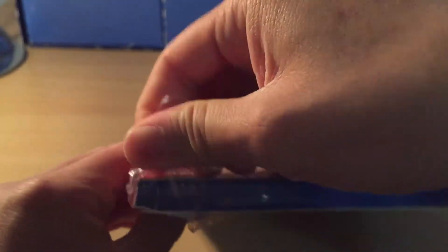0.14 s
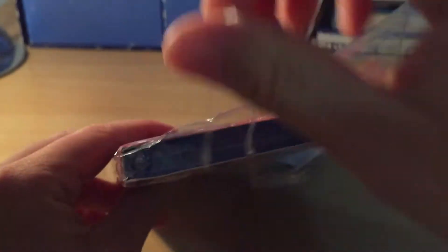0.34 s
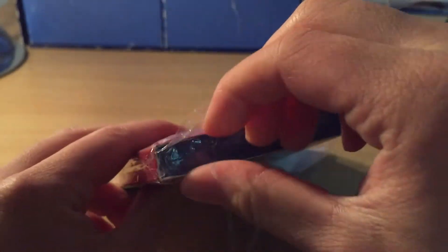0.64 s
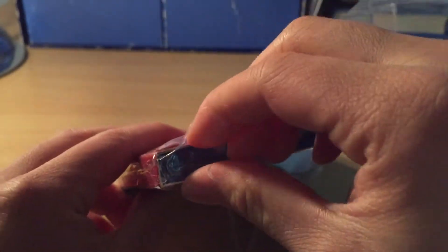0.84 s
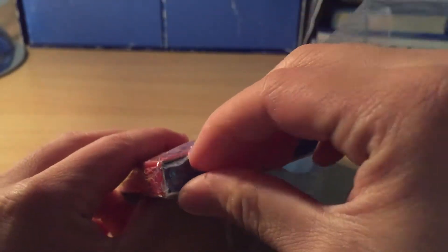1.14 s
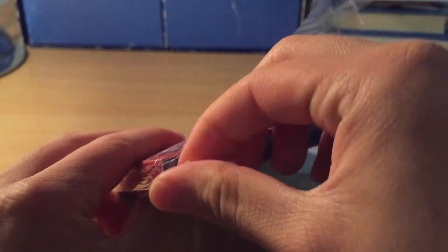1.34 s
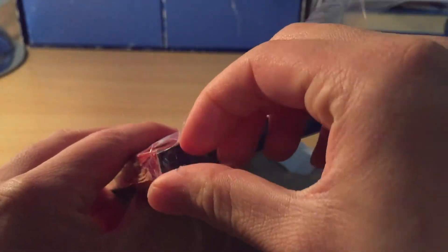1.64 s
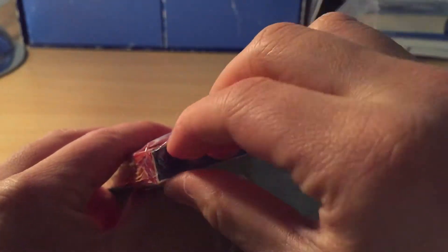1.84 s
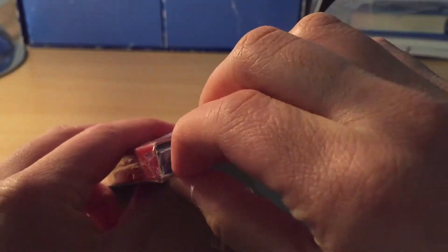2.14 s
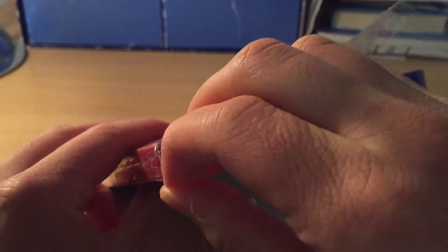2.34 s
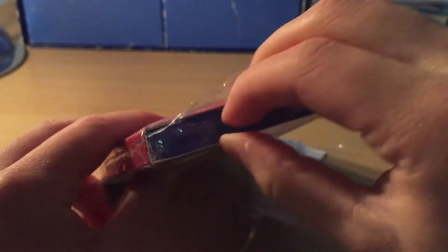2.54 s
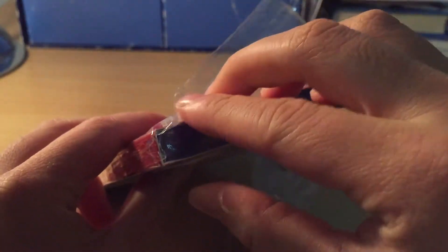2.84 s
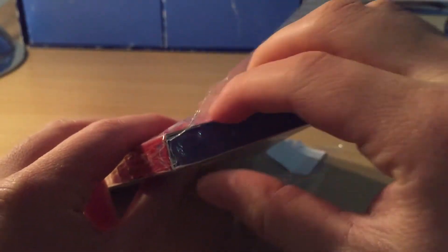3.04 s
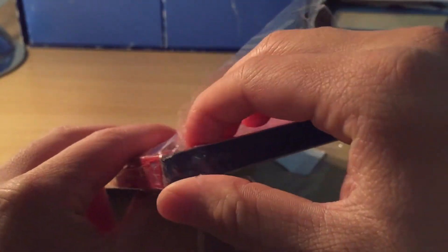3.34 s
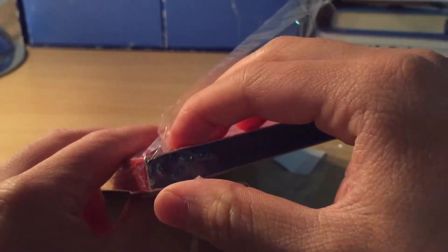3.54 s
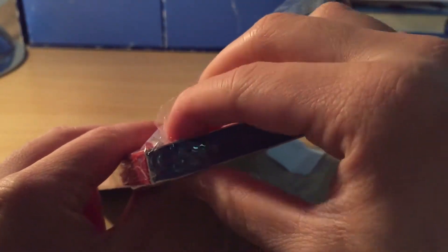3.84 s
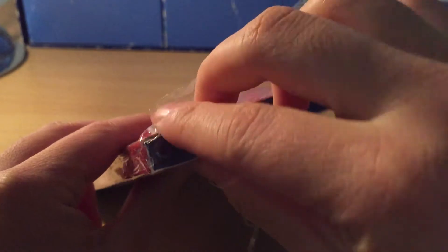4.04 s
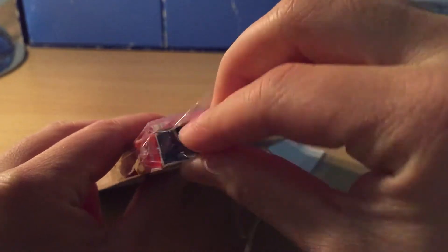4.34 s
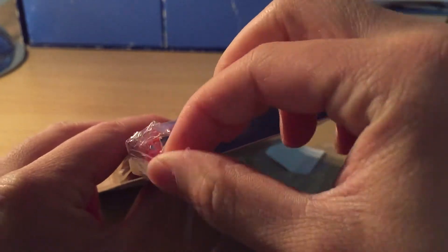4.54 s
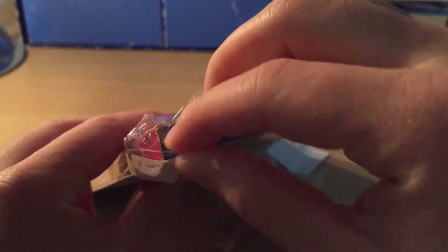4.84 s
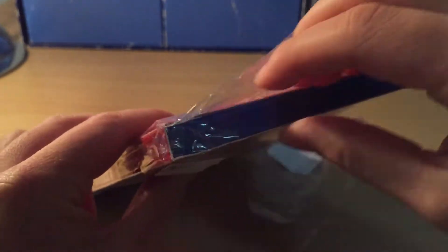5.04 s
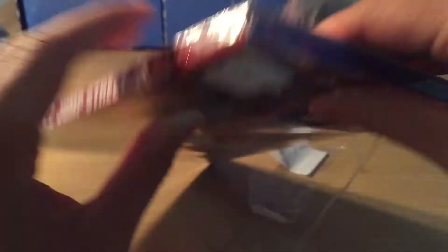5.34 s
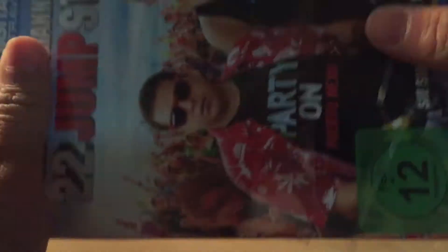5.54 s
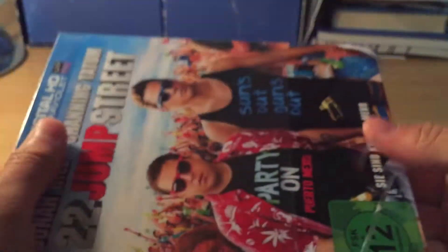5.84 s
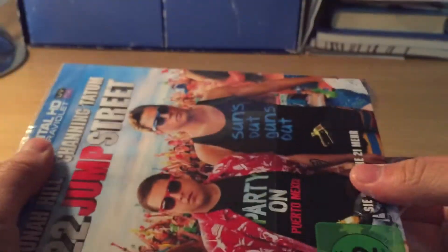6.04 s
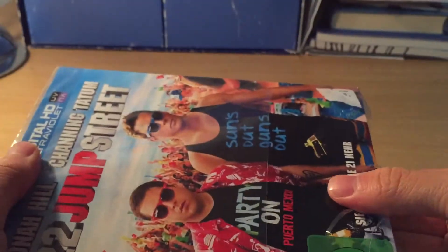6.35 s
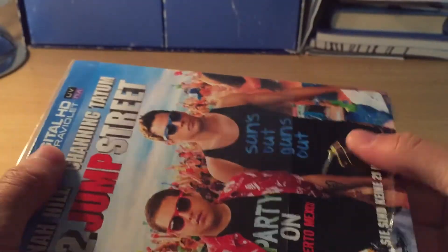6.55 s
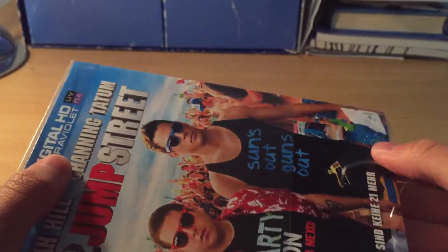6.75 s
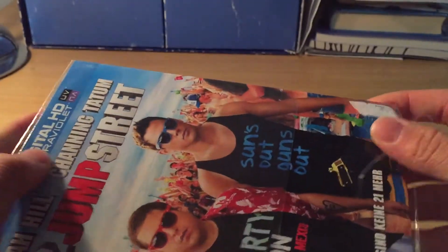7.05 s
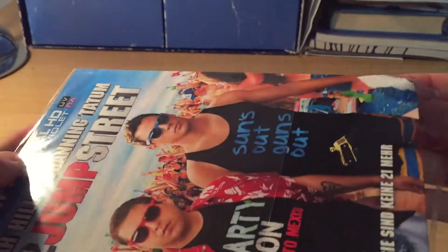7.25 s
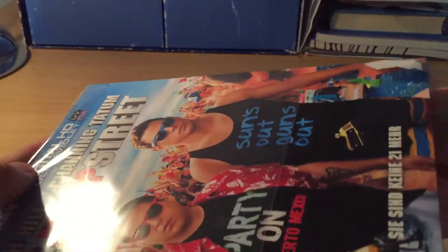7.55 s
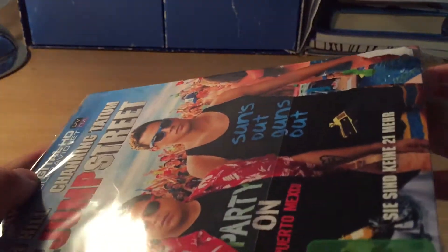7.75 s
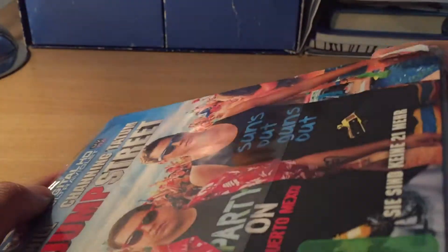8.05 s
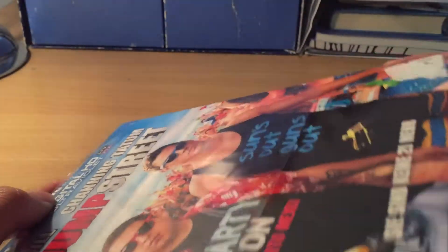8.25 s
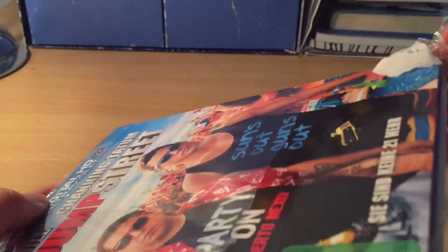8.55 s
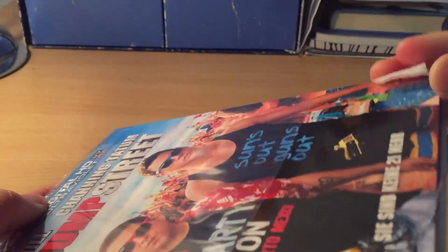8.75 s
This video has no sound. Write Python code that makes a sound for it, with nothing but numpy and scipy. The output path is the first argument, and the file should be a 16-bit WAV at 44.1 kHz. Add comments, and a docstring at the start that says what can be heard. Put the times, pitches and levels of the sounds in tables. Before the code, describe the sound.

Plastic film crackles close to the microphone at a desk: an opening flurry of sharp pops, then sparse picking with isolated snaps, small rubs and dull knocks on a light hollow case. After a handling bump, crinkling becomes denser and harder, with brief rips and strong bright cracks. Short indoor reflections and a faint steady hush surround it.

```python
"""At a desk in a small room, fingers pick at the shrink-wrap on a cardboard case and peel it off, close to a microphone.
Pulls make the loose film crinkle and pop small creases at random; big creases snap singly, film tears in swarms of
tiny slips, squeaks or faintly whistles: shaped noise and resonances, with sines in the whistle and the thumps.
The case answers with hollow knocks, rubs, soft thumps and low shifts, from decaying or stick-slip resonances.
A desk bounce and a short noise tail reflect it all, over a faint steady background noise."""
import sys
import numpy as np
from scipy import signal
from scipy.fft import rfft, irfft
from scipy.io import wavfile
from scipy.ndimage import uniform_filter1d

SR = 44100
rng = np.random.default_rng(int(sys.argv[2]) if len(sys.argv) > 2 else 0)


def digitize_waveform(pressure):
    """Quantize a signal to 16-bit integers and store it at the path in sys.argv[1].

    Rows of a 2-D input are taken as channels; values are limited to [-1, 1].
    """
    field = np.atleast_2d(pressure).T
    bounded = np.clip(field, -1, 1)
    quanta = np.round(bounded * 32767).astype(np.int16)
    wavfile.write(sys.argv[1], SR, quanta)


N = 392975


def undb(db):
    """Decibels to gain."""
    return 10 ** (np.asarray(db) / 20)


def unit(x):
    """Scale to rms 1."""
    return x / np.sqrt(np.mean(x ** 2))


def fade(t, t60):
    """Exponential decay, 60 dB down after t60 seconds."""
    return np.exp(-np.log(1000) * t / t60)


def add(out, start_s, x):
    """Mix x into out from start_s."""
    i = int(np.clip(start_s * SR, 0, N - 1))
    out[i:i + len(x)] += x[:N - i]


def colour(x, points, size=2048):
    """Minimum-phase filter of unit power gain, shaped through (frequency [Hz], relative gain [dB])."""
    hz, db = np.transpose(points)
    f = np.maximum(np.arange(size // 2 + 1) * SR / size, 1)
    gain = unit(undb(np.interp(np.log(f), np.log(hz), db)))
    cepstrum = irfft(np.log(gain))[:size // 2]
    cepstrum[1:] *= 2  # folded: causal
    impulse = irfft(np.exp(rfft(cepstrum, size)))
    return signal.oaconvolve(x, impulse)[:len(x)]


def resonate(x, hz, q):
    """One resonance, gain 1 at its centre."""
    w = 2 * np.pi * min(hz, SR / 2 - 1000) / SR
    a = np.sin(w) / (2 * q)
    return signal.lfilter([a, 0, -a], [1 + a, -2 * np.cos(w), 1 - a], x)


def clicks(length, rate_per_s, spread_db):
    """Random clicks of either sign: many small, a few large."""
    hit = rng.random(length) < rate_per_s / SR
    strength = np.minimum(rng.standard_exponential(length), 4)
    sign = rng.choice([-1, 1], length)
    return hit * sign * undb(spread_db * strength)


def flutter(pulses, t60, tint_db, q=3, bands=10):
    """Each click shakes its own patch of film, so each rings briefly with a colour of its own."""
    out, at = 0, np.flatnonzero(pulses)
    for hz in np.geomspace(300, 13000, bands):
        tint = undb(tint_db * np.clip(rng.standard_normal(len(at)), -2, 2))
        kicks = np.zeros(len(pulses)) + 1e-18
        kicks[at] = (pulses[at] * tint) ** 2
        energy = signal.lfilter([1], [1, -fade(2 / SR, t60)], kicks)
        out = out + resonate(np.sqrt(energy) * rng.standard_normal(len(pulses)), hz, q)
    return unit(out)


def friction(strokes, q, slip_hz, uneven_db):
    """Noise in uneven steps, as of sticking and slipping, keeps one resonance sounding for each stroke."""
    out = np.zeros(N)
    for start_s, length_s, db, hz in strokes:
        n = int(max(length_s, 0.02) * SR)
        steps = undb(uneven_db * np.clip(rng.standard_normal(n), -2, 2))
        grip = steps[(np.arange(n) * slip_hz / SR).astype(int)]  # one strength held per slip
        ring = resonate(resonate(grip * rng.standard_normal(n), hz, q), hz, q / 4)
        add(out, start_s, undb(db) * unit(ring) * signal.windows.tukey(n, 0.7))
    return out


def snaps(creases, ring_t60_s=0.013):
    """A crease buckles: faint noise swells in just before the crack, which rings its facets; then the film shivers."""
    # film colour: (frequency [Hz], relative gain [dB])
    film_colour = [(200, -2), (1400, -7.5), (4200, 2.5), (8000, 2), (10500, -1), (13000, 1.5),
                   (16000, -0.5)]
    size, lead_size, delay_s = 2000, 300, 0.000993
    faintest_db, crack_db, body_db = -44, -7.5, 5.0
    out, t = np.zeros(N), (np.arange(size) - lead_size) / SR
    after, before = np.maximum(t, 0), np.maximum(-t, 0)
    # envelopes around the break at t = 0
    buckle = np.exp(-before / 0.0002) * (fade(after, 0.00055) + 0.49 * fade(after, ring_t60_s))
    lead_in = undb(-30) * (t <= 0) * fade(before, 0.077)
    shiver = undb(-32) * (t > 0) * fade(after, 0.053)
    faint = lead_in + shiver
    sheet = np.exp(-before / 0.0004) * fade(after, ring_t60_s)
    high = signal.butter(2, 3200, "high", fs=SR)
    for start_s, db, hz, hollow_db in creases:
        crack_noise, sheet_noise, faint_noise = rng.standard_normal((3, size))
        facet_hz, wide_hz = rng.uniform(5000, 14600), rng.uniform(1190, 2460)
        if db < faintest_db:
            continue
        push = crack_noise * buckle
        crack = resonate(push, hz, q=5.4) + resonate(push, facet_hz, q=6) + 0.42 * push
        crack = unit(signal.lfilter(*high, crack))
        # the wider sheet around the crease gives more slowly and sounds lower
        give = sheet_noise * (sheet + 0.35 * faint)
        body = unit(resonate(resonate(give, wide_hz, q=2.24), wide_hz, q=0.5))
        snap = undb(crack_db) * crack + undb(body_db + hollow_db) * body
        snap = np.sqrt(np.mean(buckle ** 2)) * snap
        snap = snap + undb(crack_db) * faint * faint_noise
        add(out, start_s + delay_s - lead_size / SR, undb(db) * snap)
    return colour(out, film_colour)


def film_motion():
    """Each pull takes hold quickly, slackens while it lasts, and lets the film settle."""
    # pulls and grips that move the loose film: (time of full hold [s], length [s], motion level [dB])
    pulls = [(0.0, 0.13, -51), (0.212, 0.096, -44), (0.575, 0.017, -54.5), (0.625, .18, -58.5),
             (1.049, 0.024, -59.5), (1.21, 0.078, -47.5), (1.397, 0.012, -57.5), (1.985, 0.09, -66),
             (2.707, 0.035, -49), (2.787, 0.073, -60), (3.113, .1, -55.5), (3.547, 0.018, -55),
             (3.75, 0.025, -54), (3.978, 0.085, -57), (4.268, 0.086, -55.5), (4.402, 0.051, -49),
             (4.567, .12, -51), (4.799, 0.18, -61), (4.926, 0.15, -55), (5.194, 0.12, -49.5),
             (5.36, 0.034, -61), (5.613, 0.023, -55.5), (5.79, 0.055, -53.5), (5.863, 0.093, -46.5),
             (6.014, .06, -52.5), (6.13, 0.15, -63), (6.428, 0.016, -51), (6.485, .06, -49.5),
             (6.576, .16, -44), (6.76, 0.17, -53), (6.928, 0.072, -42), (7.114, 0.074, -42.5),
             (7.248, 0.084, -49), (7.44, 0.12, -45.5), (7.523, 0.16, -52), (7.776, 0.13, -62.5),
             (7.966, .03, -42), (8.12, 0.065, -57), (8.2, 0.039, -48.5), (8.285, 0.074, -47),
             (8.589, 0.11, -54), (8.805, 0.12, -47)]
    attack_s, sag_db_per_s, release_t60_s = 0.0095, 34, 0.18
    power, t = np.zeros(N) + 1e-18, np.arange(SR) / SR
    for hold_s, length_s, db in pulls:
        release = fade(np.maximum(t - attack_s - length_s, 0), release_t60_s)
        shape = np.minimum(t / attack_s, 1) * release
        add(power, hold_s - attack_s, (undb(db - sag_db_per_s * t) * shape) ** 2)
    return np.sqrt(power)


def small_creases(motion, count=700):
    """Creases pop at random while the film moves, louder under harder pulls; rows like those of the big snaps."""
    tries_per_s, low_hz, high_hz, hollow_db = 42, 3270, 12000, -17
    typical_pull_db, typical_db, range_db, db_per_pull_db = -50, -30, 18.5, 0.57
    when, pitch, strength = rng.random((count, 3)).T
    start_s = when * count / tries_per_s
    pull = np.interp(start_s, np.arange(N) / SR, motion, right=1e-9)
    pull_db = 20 * np.log10(pull)
    db = typical_db + db_per_pull_db * (pull_db - typical_pull_db) + range_db * (strength - 0.5)
    hz = low_hz * (high_hz / low_hz) ** pitch
    return np.column_stack([start_s, db, hz, np.full(count, hollow_db)])


def peels():
    """The film gives way in a rapid run of tiny slips that weakens as the tension goes."""
    # film tearing or coming unstuck: (start [s], length [s], level [dB])
    tears = [(0.265, 0.018, -31), (0.336, 0.06, -46.5), (0.556, 0.04, -42), (1.337, 0.026, -46),
             (1.975, 0.019, -42.5), (2.303, 0.012, -33), (2.716, 0.029, -47), (3.088, 0.023, -54),
             (3.357, 0.027, -44), (5.187, 0.047, -42.5), (5.262, 0.046, -35), (5.382, 0.037, -42.5),
             (6.021, 0.034, -35.5), (6.576, 0.0095, -38), (6.602, 0.039, -34), (6.702, 0.042, -35.5),
             (6.944, 0.0241, -27), (7.134, 0.08, -36.5), (7.549, 0.047, -41), (7.615, 0.014, -31),
             (7.997, 0.018, -29), (8.28, 0.014, -28.5), (8.342, 0.0179, -22.5), (8.366, 0.004, -27),
             (8.656, 0.0091, -32)]
    # tear colour: (frequency [Hz], relative gain [dB])
    tear_colour = [(150, 5.5), (400, -4.5), (900, -5), (1500, -3.5), (2300, -1), (4200, 0), (7000, -1),
                   (10500, 0), (13000, -2.5), (16000, 6.5)]
    out = np.zeros(N)
    for start_s, length_s, db in tears:
        n = int(max(length_s, 0.005) * SR)
        shape = signal.windows.tukey(n, 0.2) * np.exp(-0.39 * np.arange(n) / n)
        slips = flutter(clicks(n, rate_per_s=1000, spread_db=2.5), t60=0.0068, tint_db=-1)
        add(out, start_s, undb(db) * unit(slips * shape))
    return colour(out, tear_colour)


def crinkle(motion):
    """Tiny creases tick in the loose film whenever it moves, over the rustle of layers sliding on each other."""
    # loose film colour: (frequency [Hz], relative gain [dB])
    loose_colour = [(200, -17), (700, -1.5), (1400, -8.5), (2300, -3), (4000, -3.5), (6500, -2),
                    (10500, -5.5), (15500, -9.5)]
    ticks = flutter(clicks(N, rate_per_s=450, spread_db=6.5), t60=0.018, tint_db=6)
    rustle = 0.44 * rng.standard_normal(N)
    return undb(-2) * motion * colour(ticks + rustle, loose_colour)


def squeaks_and_narrow_crinkles():
    """Film squeaks as it slides, or crinkles in a narrow band near 2 kHz: uneven noise in one resonance."""
    # squeaks and narrow crinkles: (start [s], length [s], level [dB], pitch [Hz])
    strokes = [(2.41, 0.034, -56, 5540), (2.52, .083, -57, 6000), (5.18, 0.033, -46, 1950),
               (6.47, 0.045, -54, 1990), (7.40, .1, -54, 4200), (8.58, .069, -54, 2440)]
    return friction(strokes, q=11, slip_hz=262.0, uneven_db=7.0)


def whistle():
    """A taut fold slips so fast and evenly that it sings one thin, wavering note, its pitch following its speed."""
    start_s, length_s, level_db = 0.59, 0.25, -71
    base_hz, rise_hz, waver_hz, waver_s = 2520, 380, 22, 0.004
    out, n = np.zeros(N), int(length_s * SR)
    speed = np.sin(np.pi * np.arange(n) / n)
    waver = unit(uniform_filter1d(rng.standard_normal(N), int(waver_s * SR)))[:n]
    hz = base_hz + rise_hz * speed + waver_hz * waver
    tone = np.sin(2 * np.pi * np.cumsum(hz) / SR) * signal.windows.tukey(n, 0.6)
    add(out, start_s, undb(level_db) * unit(tone))
    return out


def knocks(size=3000):
    """The hollow case, knocked by a nail or by film letting go, rings dully; pitch depends on where it is held."""
    # knocks: (start [s], peak level [dB], pitch [Hz])
    hits = [(0.275, -35, 734), (0.584, -42, 855), (1.342, -35, 740), (1.752, -32.5, 810),
            (1.981, -29, 1060), (2.658, -38, 670), (2.721, -29.5, 765), (4.122, -31, 1230),
            (5.032, -44, 1220), (5.272, -38, 1300), (5.649, -31, 570), (6.579, -35, 875),
            (6.63, -31.5, 710), (6.8, -33, 1200), (6.945, -23, 925), (7.547, -39, 910), (7.581, -36, 746),
            (7.625, -35, 775), (8.001, -32, 1120), (8.282, -18, 636), (8.34, -22, 910), (8.709, -30, 1060)]
    out, t = np.zeros(N), np.arange(size) / SR
    for start_s, db, hz in hits:
        burst = rng.standard_normal(size) * fade(t, 0.02)
        ring = resonate(resonate(burst, hz, q=3.75), hz, q=0.067)
        add(out, start_s, undb(db) * ring / np.abs(ring).max())
    return out


def rubs():
    """Fingertips drag over the case: skin sticks and slips on the wrapped card."""
    # rubs: (start [s], length [s], level [dB])
    drags = [(0.205, 0.086, -60), (1.726, 0.057, -55.5), (2.543, 0.073, -56), (2.649, 0.029, -52.5),
             (3.091, 0.02, -55), (3.455, 0.069, -56), (4.779, 0.062, -50.5), (4.866, 0.045, -53.5),
             (5.27, 0.27, -60), (5.623, 0.054, -55.5), (6.585, 0.076, -46), (7.132, 0.052, -63)]
    # card colour: (frequency [Hz], relative gain [dB])
    card_colour = [(100, -21), (350, -14.5), (600, -3), (850, 2), (1200, -11), (2000, -16), (6000, -14),
                   (14000, -18.5)]
    out = np.zeros(N)
    for start_s, length_s, db in drags:
        n = int(max(length_s, 0.01) * SR)
        slips = flutter(clicks(n, rate_per_s=900, spread_db=3.0), t60=0.0067, tint_db=3.0)
        add(out, start_s, undb(db) * slips * signal.windows.tukey(n, 0.5))
    return colour(out, card_colour)


def thumps(size=8000):
    """A soft push of the hand rocks the case for a few cycles: a decaying sine with rough noise around it."""
    # bumps in the hands: (start [s], peak level before the common trim [dB], pitch [Hz])
    bumps = [(0.217, -41.5, 124), (0.265, -39.5, 111), (1.343, -42, 186), (2.594, -48.5, 191),
             (2.664, -43, 207), (3.468, -43, 123), (4.359, -52, 55.4), (4.429, -44, 65),
             (5.271, -41.5, 124), (5.624, -34.5, 58.6), (6.707, -48, 79), (6.942, -56, 204),
             (7.164, -43, 192), (7.489, -44.5, 149), (7.999, -38, 89), (8.284, -37, 120), (8.34, -33, 67.4)]
    trim_db = -1
    out, t = np.zeros(N), np.arange(size) / SR
    for start_s, db, hz in bumps:
        rough = unit(resonate(resonate(rng.standard_normal(size), hz, q=0.5), hz, q=0.4))
        sway = np.sin(2 * np.pi * hz * t) + 0.6 * rough
        sway = sway * fade(t, 0.058) * (1 - fade(t, 0.03))  # decay, soft onset
        add(out, start_s, undb(db + trim_db) * sway / np.abs(sway).max())
    return out


def shifts(pitch_hz=64.5):
    """The case shifts under a tight grip, sticking and slipping on a low resonance."""
    # shifts: (start [s], length [s], level [dB])
    moves = [(3.453, 0.49, -66.5), (4.294, 0.3, -76), (5.6, .24, -58), (7.993, 0.43, -61.5)]
    strokes = [(*move, pitch_hz) for move in moves]
    return friction(strokes, q=4.5, slip_hz=30.4, uneven_db=9)


def room(x, size=20000):
    """A bounce off the desk, a scatter from the things on it, and the short tail of a furnished room."""
    desk_s, desk_gain, scatter_s = 0.0023, 0.078, 0.0074
    near_db, near_t60_s, tail_db, tail_t60_s, damp_hz = -20, 0.0053, -17, 0.14, 9000
    t = np.arange(size) / SR
    damp = signal.butter(1, damp_hz, fs=SR)
    tail = signal.lfilter(*damp, rng.standard_normal(size)) * fade(t, tail_t60_s)
    near = rng.standard_normal(size) * fade(t, near_t60_s)
    response = (undb(tail_db) * unit(tail) + undb(near_db) * unit(near)) / np.sqrt(size)
    out = x.copy()
    add(out, desk_s, desk_gain * x)
    add(out, scatter_s, signal.oaconvolve(x, response)[:N])
    return out


def background(level_db=-62):
    """Steady coloured noise."""
    # background colour: (frequency [Hz], relative gain [dB])
    air_colour = [(29, -25), (50, 3), (77, -6.5), (140, 0.5), (584, -7), (1380, -10.5), (2020, -10.5),
                  (2330, -12), (6060, -13.5), (15000, -18)]
    return undb(level_db) * unit(colour(rng.standard_normal(N), air_colour, size=8192))


def scene():
    """Film and case in the room, over a faint steady background."""
    # big creases snapping: (time [s], level [dB], strongest ring [Hz], hollow body trim [dB])
    big_creases = [(.0473, -17.5, 9700, -18.5), (.0845, -21, 5630, -27), (.0952, -23, 3200, -12),
                   (.117, -24, 8200, -21), (.175, -18, 5650, -22), (.2234, -22.5, 11900, -18),
                   (.2964, -14.5, 6800, -22), (.3174, -17, 7100, -22), (.3506, -20, 4200, -18),
                   (.3645, -20, 9200, -19), (.3875, -17.5, 7140, -14), (.5554, -16, 6000, -15.5),
                   (.7442, -21, 6350, -22), (1.2148, -28, 6150, -9.5), (1.2358, -27, 2780, -9.5),
                   (1.2963, -11, 7700, -33), (1.336, -20.5, 4650, -40), (1.36, -22.5, 5080, -20),
                   (1.505, -22, 4970, -17.5), (1.983, -16, 6600, -42), (2.3106, -18.5, 8600, -20),
                   (2.7216, -21, 2660, -11.5), (2.732, -16.5, 5500, -31), (2.7497, -14, 5950, -27),
                   (2.8444, -17.5, 12000, -40), (3.1224, -26.5, 6540, -10.5), (3.1737, -11, 4260, -25),
                   (3.3703, -18.5, 8800, -24), (3.5773, -22, 5200, -19), (3.7444, -23.5, 5100, -39),
                   (3.7806, -22.5, 8500, -17), (3.8967, -23, 11400, -23), (4.101, -17, 12200, -22),
                   (4.1215, -12.5, 12100, -13), (4.1445, -26.5, 8410, -34), (4.272, -29, 5330, -14),
                   (4.278, -23.5, 2650, -9), (4.334, -23, 6500, -20), (4.411, -17, 4430, -21),
                   (4.4217, -17.5, 5600, -18), (4.435, -14.5, 6020, -42), (4.4558, -17, 14400, -40),
                   (4.504, -22, 11700, -43), (4.591, -22.5, 5670, -24), (4.612, -15.5, 12700, -19.5),
                   (4.6586, -15, 12000, -25), (4.9613, -15.5, 8900, -39), (4.9767, -17, 11900, -39),
                   (5.033, -20.5, 6700, -11.5), (5.2125, -22, 13700, -21), (5.2701, -9, 9700, -22),
                   (5.2818, -15, 9300, -25), (5.3854, -24.5, 6300, -20), (5.5115, -27.5, 5870, -18),
                   (5.6545, -41, 2870, 9.5), (5.9203, -21, 6750, -25), (6.0462, -13, 13300, -16.5),
                   (6.2171, -20.5, 6640, -19), (6.2471, -23.5, 4900, -28), (6.2863, -25, 5200, -17),
                   (6.4829, -18.5, 14000, -20), (6.499, -24, 8500, -9), (6.581, -14, 9850, -11),
                   (6.628, -23, 6910, -1.5), (6.6937, -22, 3230, -9), (6.7067, -11, 4200, -18),
                   (6.7999, -23, 7100, -15), (6.926, -24, 5340, -14), (6.9421, -16, 4540, -4),
                   (6.9526, -11, 4430, -12), (6.9911, -23, 4200, -7), (7.1244, -20, 11800, -14),
                   (7.143, -16.5, 6700, -24), (7.1606, -6, 5440, -38), (7.1896, -12.5, 5900, -29),
                   (7.213, -17, 4570, -17), (7.2234, -18, 5900, -29), (7.478, -20.5, 4160, -12.5),
                   (7.489, -15, 5000, -38), (7.5476, -13, 8340, -16.5), (7.564, -15, 4020, -23),
                   (7.5825, -13.5, 3970, -15), (7.6234, -15, 3160, -17), (7.8196, -32, 7240, -41),
                   (7.8516, -27, 11600, -39), (7.8947, -20.5, 3100, -16.5), (7.9468, -21.5, 8900, -18),
                   (7.9789, -19.5, 6500, -14), (8.0033, -6, 7460, -33), (8.01, -16, 5790, -25),
                   (8.1934, -21, 8400, -12.5), (8.2242, -22, 12600, -11), (8.2367, -18.5, 9840, -17),
                   (8.2835, -9.5, 13900, -11), (8.329, -17, 12100, -27), (8.3412, -3.5, 8700, -15),
                   (8.3652, -6, 4300, -15.5), (8.3976, -16, 8950, -14), (8.4077, -25, 2520, 1),
                   (8.5405, -15, 14300, -27.5), (8.6568, -17, 3360, -12.5), (8.6693, -22, 6040, -36),
                   (8.7099, -9.5, 8600, -22), (8.8255, -20.5, 3900, -21)]
    motion = film_motion()
    creases = snaps(big_creases) + snaps(small_creases(motion), ring_t60_s=0.01)
    film = creases + peels() + crinkle(motion) + squeaks_and_narrow_crinkles() + whistle()
    case = knocks() + rubs() + thumps() + shifts()
    return (room(film + case) + background())[None]


def record(dry):
    """The recorder drops the deepest bass and cuts the top."""
    low_cut = signal.butter(4, 38, "high", fs=SR, output="sos")
    top_cut = signal.ellip(10, 0.2, 70, 15400, fs=SR, output="sos")
    return signal.sosfilt(top_cut, signal.sosfilt(low_cut, dry))


dry = scene()
out = record(dry)
digitize_waveform(out)
```